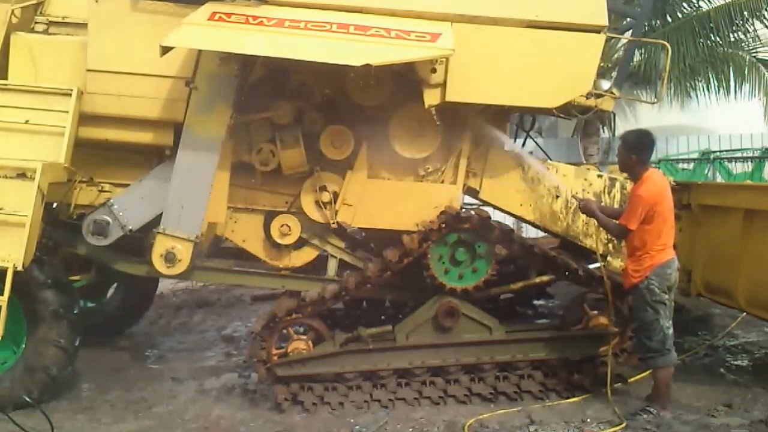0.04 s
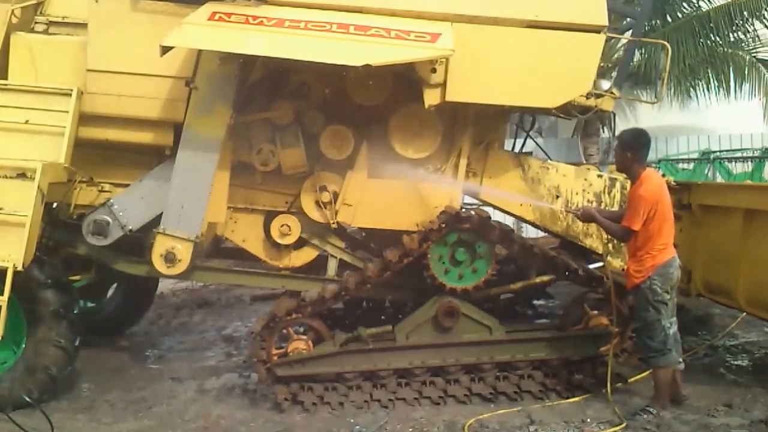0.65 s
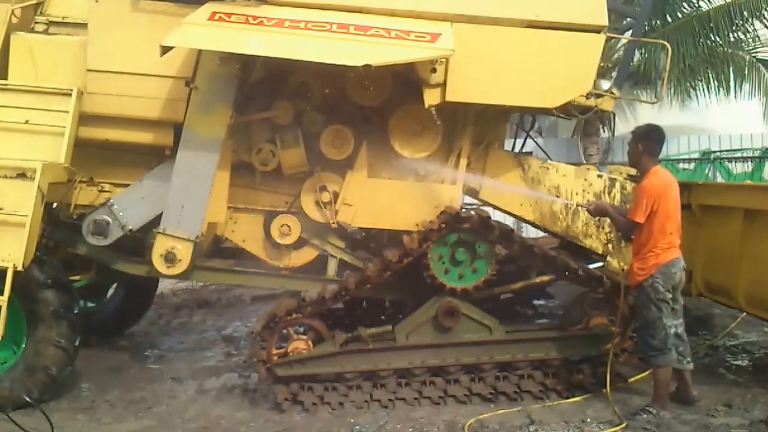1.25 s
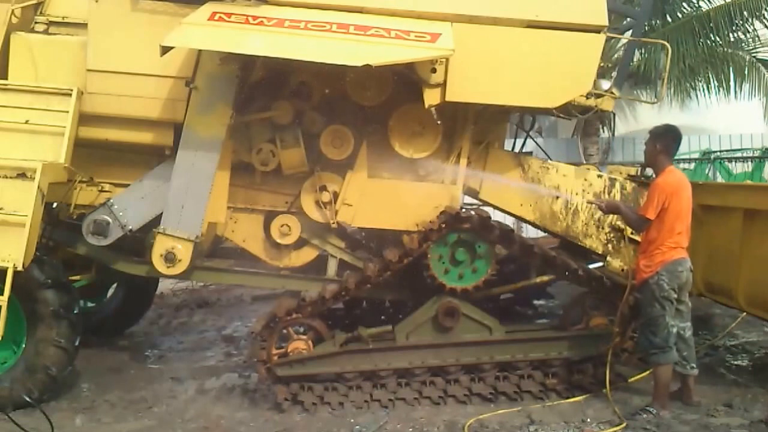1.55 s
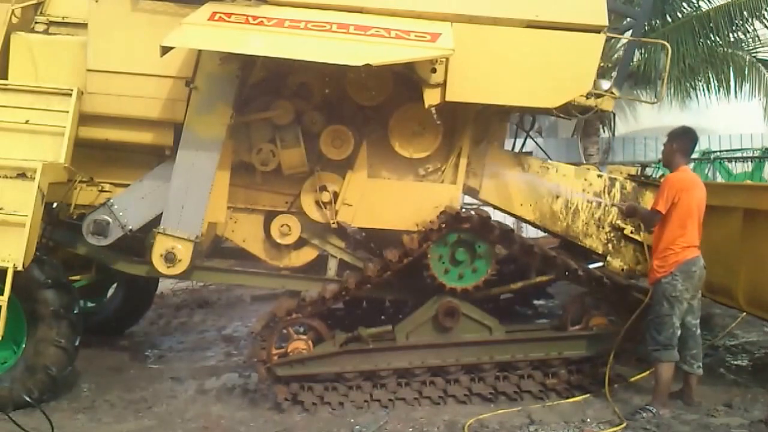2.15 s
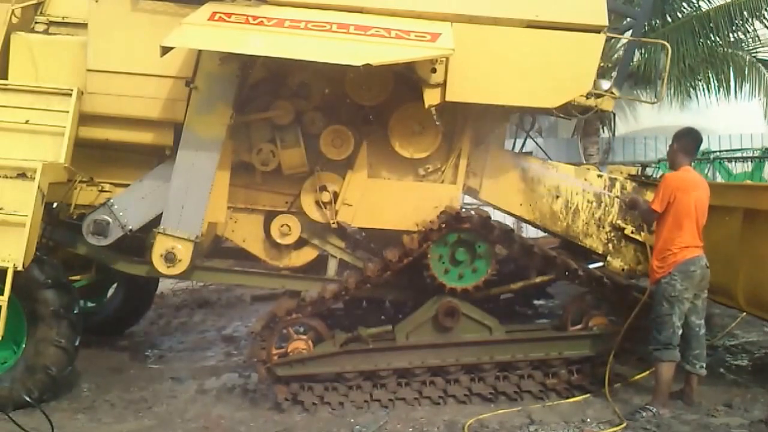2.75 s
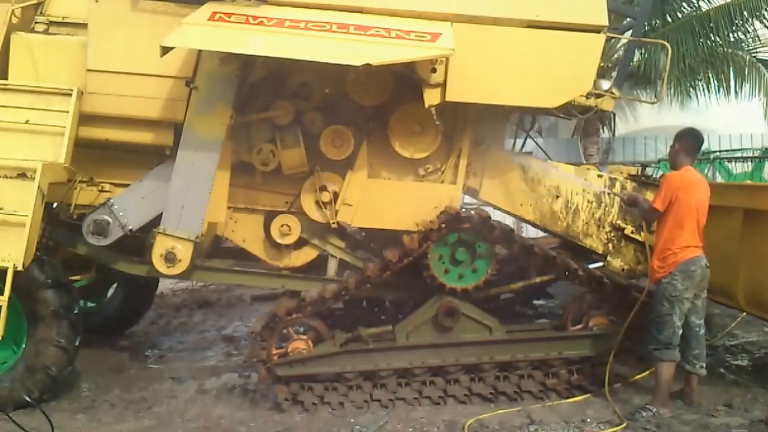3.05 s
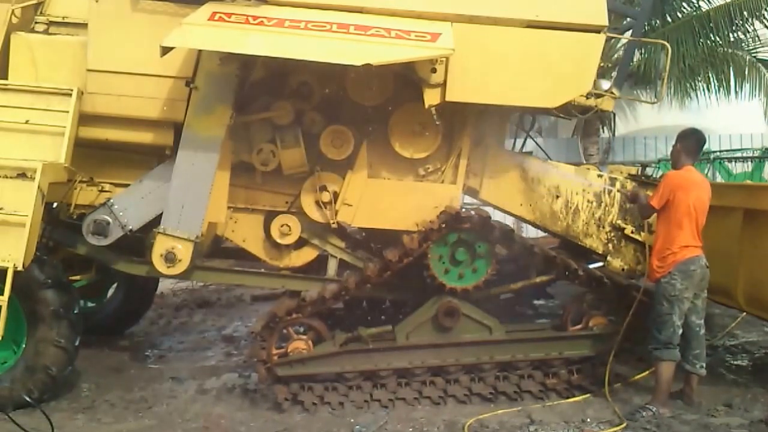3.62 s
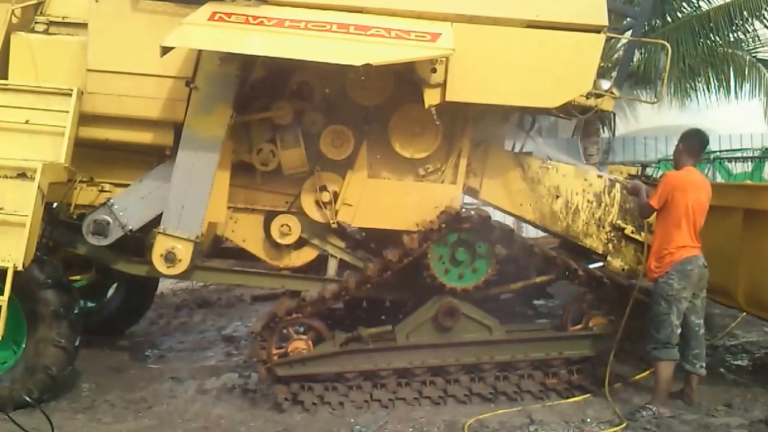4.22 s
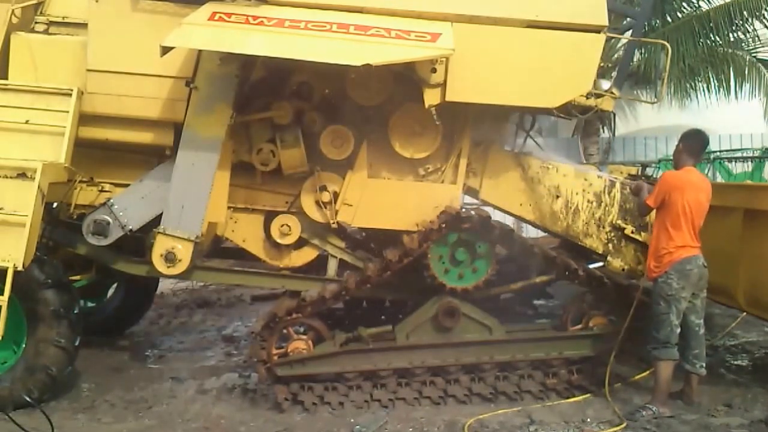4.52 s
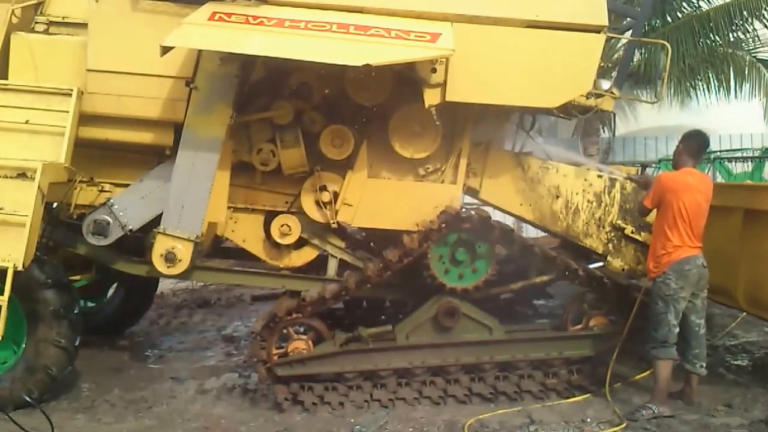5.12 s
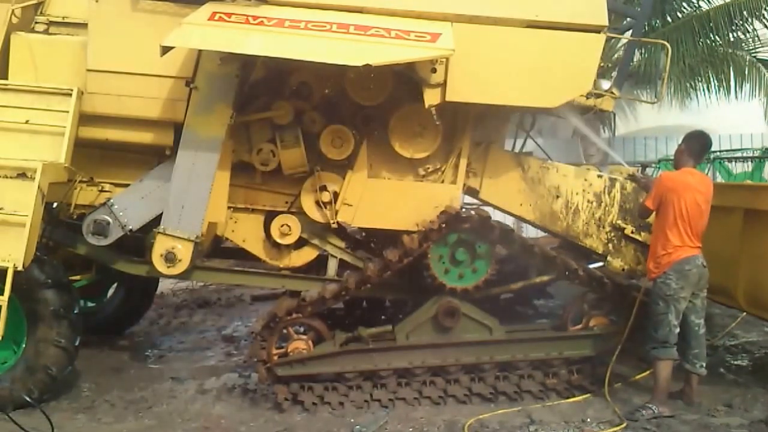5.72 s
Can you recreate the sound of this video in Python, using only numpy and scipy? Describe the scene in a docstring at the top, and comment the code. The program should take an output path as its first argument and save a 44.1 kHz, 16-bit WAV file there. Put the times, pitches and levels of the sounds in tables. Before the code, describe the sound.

A pressure washer sprays a big steel farm machine outdoors, a few metres from the microphone. Its bright hiss and rough splash run without a break, flaring briefly as the jet crosses edges. The spray swells twice around the middle, then drops suddenly to a softer hiss. Underneath, the panels drum and occasionally give a faint boom over a low outdoor rumble.

```python
"""A pressure washer jet plays over the muddy side of a big steel farm machine, outdoors, a few metres away.
It hisses as it breaks into mist and splash, flares across edges and rasps in recesses.
Its push drums on the panels and now and then sets a large sheet booming.
Drops patter on the steel over a low outdoor rumble."""
import sys
import numpy as np
from scipy import signal
from scipy.fft import rfft, irfft
from scipy.io import wavfile
from scipy.ndimage import uniform_filter1d

SR = 44100
rng = np.random.default_rng(int(sys.argv[2]) if len(sys.argv) > 2 else 0)


def pcm_store(signal):
    """Save signal as 16-bit PCM."""
    levels = np.round(np.clip(np.atleast_2d(signal), -1, 1) * 32767)
    wavfile.write(sys.argv[1], SR, levels.astype(np.int16).T)


N = 254456
TIME = np.arange(N) / SR
BINS_HZ = np.fft.rfftfreq(N, 1 / SR)


def gain_of(db):
    """Decibels to a linear gain."""
    return 10 ** (np.asarray(db) / 20)


def unit_rms(x):
    """Scales to rms 1."""
    return x / np.sqrt(np.mean(x ** 2) + 1e-20)


def curve(points, hz=BINS_HZ):
    """Joins a table's points with straight lines on a log-frequency axis."""
    points_hz, values = np.transpose(points)
    return np.interp(np.log(hz + 1), np.log(points_hz), values)


def bell(centre_s, half_length_s):
    """A bell-shaped envelope peaking at 1."""
    return np.exp(-((TIME - centre_s) / half_length_s) ** 2)


def shaped(x, gain):
    """Filters by a gain for each frequency, then scales to rms 1."""
    return unit_rms(irfft(rfft(x) * gain, N))


def wander(top_hz):
    """Random modulation of rms 1, rolling off above top_hz."""
    return shaped(rng.standard_normal(N), (BINS_HZ > .5) / (1 + (BINS_HZ / top_hz) ** 4))


# Likeness of left and right: frequency_hz, correlation
STEREO_LIKENESS = [(30, 0.28), (90, 0.6), (300, 0.62), (640, 0.44), (1400, 0.25), (3000, 0.063),
                   (7000, 0.026)]

def turbulence(patchy_db, frame=1024, hop=256):
    """Stereo noise whose colour shifts in short patches, narrower in the bass and wide in the treble."""
    hz = np.fft.rfftfreq(frame, 1 / SR)
    a, b, c, d, patches = rng.standard_normal((N // hop + 5, len(hz), 5)).T
    patches = uniform_filter1d(patches, size=12, axis=0)  # across frequency
    patches = unit_rms(uniform_filter1d(patches, size=10, axis=1))  # across time
    likeness = curve(STEREO_LIKENESS, hz)[:, None]
    left = a + 1j * b
    right = likeness * left + np.sqrt(1 - likeness ** 2) * (c + 1j * d)
    spectra = np.array([left, right]) * gain_of(patchy_db * patches)
    return signal.istft(spectra, nperseg=frame, noverlap=frame - hop)[1][:, :N]


def noise_bed(spectrum, patchy_db):
    """Turbulent noise of rms 1, coloured by a spectrum table."""
    return shaped(turbulence(patchy_db), gain_of(curve(spectrum)))


# Tone of the outdoor background: frequency_hz, relative_db
RUMBLE_TONE = [(10, -19), (25, 1.5), (55, 3), (100, -1.5), (150, -6), (220, -13.5), (500, -20), (2000, -35)]

def rumble(level_db):
    """A low, steady outdoor bed."""
    return noise_bed(RUMBLE_TONE, patchy_db=.5) * gain_of(level_db)


# The jet sets a large sheet booming: start_s, length_s, level_db
SHEET_BOOMS = [(0, 0.22, -48.5), (1.18, 0.14, -44.5), (1.55, 0.082, -50), (4.08, 0.22, -45.5),
               (4.8, .12, -53), (5.147, 0.11, -48.5), (5.514, 0.13, -46)]

def boom(waver, throb_db, pitch_hz=78.4, rise_hz_per_s=1.2, attack_s=0.047, release_s=0.054):
    """A large sheet's lowest mode; the pitch creeps up over the scene and wavers with the load of water."""
    hz = (pitch_hz + rise_hz_per_s * TIME) * (1 + waver * wander(top_hz=5.3))
    envelope = gain_of(-60)  # faint hum between booms
    for start_s, length_s, level_db in SHEET_BOOMS:
        age_s = TIME - start_s
        swell = np.clip(age_s / attack_s, 0, 1)
        decay = np.exp(-np.maximum(age_s - length_s, 0) / release_s)
        envelope = envelope + gain_of(level_db) * swell * decay
    tone = unit_rms(np.sin(2 * np.pi * np.cumsum(hz) / SR))
    return tone * envelope * gain_of(throb_db * wander(top_hz=18))


# Resonances of the steel panels: pitch_hz, width_hz, peak_db
STEEL_MODES = [(229.3, 29, 10.5), (315, 19, 8), (334, 29, 4), (439.5, 16.4, 8.5), (515, 7, 10),
               (636, 21, 11), (774, 14, 6), (937, 38, 6), (1205, 65, 3), (1258, 120, 2)]

def steel_resonance():
    """Gain at each frequency of the mud-damped sheet metal: mode peaks on a flat floor."""
    peaks = sum(gain_of(peak_db) ** 2 / (1 + (2 * (BINS_HZ - pitch_hz) / width_hz) ** 2)
                for pitch_hz, width_hz, peak_db in STEEL_MODES)
    return np.sqrt(1 + peaks)


# The jet crosses loose metal: centre_s, half_length_s, pitch_hz, level_db
LOOSE_SPOT_HITS = [(0.093, 0.027, 402, -42.5), (0.202, 0.048, 210, -44), (1.045, 0.039, 630, -40.5),
                   (1.33, .05, 380, -47.5), (1.658, 0.015, 630, -42.5), (2.48, 0.036, 520, -48),
                   (4.171, 0.04, 270, -47), (5.626, 0.056, 280, -46.5)]

def loose_spots(width_octaves):
    """Each loose spot rings out briefly, favouring the panel modes near its pitch."""
    push = turbulence(patchy_db=3.0)
    resonance = steel_resonance()
    out = np.zeros((2, N))
    for centre_s, half_length_s, pitch_hz, level_db in LOOSE_SPOT_HITS:
        favoured = np.exp(-(np.log2((BINS_HZ + 1) / pitch_hz) / width_octaves) ** 2)
        out += shaped(push, resonance * favoured) * gain_of(level_db) * bell(centre_s, half_length_s)
    return out


# Broad tone of the panels: frequency_hz, relative_db
PANEL_TONE = [(100, -19), (200, -8.5), (400, 0.5), (700, -5), (1200, -4), (2000, -4), (4000, -26)]
# How squarely the jet meets the panels: time_s, level_db (before trim)
PANEL_DRIVE = [(0, -46), (.85, -46), (1.35, -44.5), (2.1, -44), (2.7, -46.5), (3.9, -46.5), (4.05, -49.5),
               (5.77, -49.5)]

def panels(trim_db, buffet_db):
    """The uneven push of the jet keeps the steel drumming."""
    level_db = np.interp(TIME, *np.transpose(PANEL_DRIVE)) + trim_db
    push = turbulence(patchy_db=2.0) * gain_of(buffet_db * wander(top_hz=30))
    return shaped(push, steel_resonance() * gain_of(curve(PANEL_TONE))) * gain_of(level_db)


def reflections(water, echo_db, span_s, drift_s, count=4):
    """Adds early echoes off the machine and wet ground; they drift as the jet moves, so the hiss phases."""
    echoes = np.zeros((2, N))
    for side in range(2):
        for path_s in np.geomspace(.0018, span_s, count):
            delay_s = path_s * rng.uniform(.85, 1.15) + drift_s * wander(top_hz=1.43)
            echoes[side] += np.interp(TIME - delay_s, TIME, water[side], left=0)
    send = gain_of(echo_db)
    return (water + send * echoes / np.sqrt(count)) / np.hypot(1, send)


def hollows(water, pitch_hz, width_hz, gain_db, drift):
    """The spray excites a narrow ring in the machine's hollows, wavering as the jet moves."""
    hz = pitch_hz * (1 + drift * wander(top_hz=4))
    carrier = np.exp(2j * np.pi * np.cumsum(hz) / SR)
    pole = np.exp(-np.pi * width_hz / SR)
    band = signal.lfilter([1 - pole], [1, -pole], water / carrier)  # shifted to 0 Hz and low-passed
    return 2 * gain_of(gain_db) * (carrier * band).real


def drops(level_db, spread_db, rate_per_s):
    """Large drops tick on the steel with the tone of the splash; a few are much heavier than the rest."""
    weight = gain_of(spread_db * np.minimum(rng.exponential(1, (2, N)), 4))
    polarity = rng.choice([-1, 1], (2, N))
    lands = rng.random((2, N)) < rate_per_s / SR
    return shaped(weight * polarity * lands, gain_of(curve(SPLASH_TONE))) * gain_of(level_db)


# The jet bites into a recess: centre_s, half_length_s, level_db
RECESS_BITES = [(0.049, 0.011, -35), (0.196, 0.017, -32.5), (0.263, 0.015, -33.5), (1.04, 0.033, -37),
                (1.785, 0.03, -39), (3.22, 0.022, -26), (3.295, 0.026, -34.5)]
# Tone of the lower, rasping splash there: frequency_hz, relative_db
RECESS_TONE = [(700, -22), (1500, -16), (2200, -1.5), (4200, 7), (6500, 4), (12000, -25)]

def bites():
    """Short, rough bursts as water is thrown back out of a recess."""
    envelope = sum(gain_of(db) * bell(centre_s, half_s) for centre_s, half_s, db in RECESS_BITES)
    return noise_bed(RECESS_TONE, patchy_db=1.5) * envelope


# Tone of water hitting steel: frequency_hz, relative_db
SPLASH_TONE = [(300, -24.5), (900, -12), (1400, -8), (2300, -2), (3200, -1.5), (4200, 0.5), (6000, 1),
               (8000, -6.5), (11000, -9), (16000, -15.5)]

def splash(level_db, sputter_db):
    """Countless impacts merge into a rough hiss that sputters as the water film tears."""
    return noise_bed(SPLASH_TONE, patchy_db=1.0) * gain_of(level_db + sputter_db * wander(top_hz=150))


# Tone of the fine spray: frequency_hz, relative_db
MIST_TONE = [(1000, -49), (3000, -11.5), (4500, -1), (7000, 0), (10000, 1.5), (14000, 2), (16000, -0.5)]

def mist(level_db, flutter_db):
    """The jet atomises into a fine, bright hiss."""
    return noise_bed(MIST_TONE, patchy_db=1.34) * gain_of(level_db + flutter_db * wander(top_hz=120))


# How hard the jet lands as the lance sweeps: time_s, impact_db
LANCE_SWEEP = [(0, -35), (.28, -34.5), (.5, -36), (1.15, -34), (1.55, -35), (2.0, -34), (2.17, -29.5),
               (2.5, -29), (2.57, -25), (3.02, -25.5), (3.14, -33), (3.45, -30), (3.58, -26), (3.95, -25.5),
               (4.0, -40), (4.43, -36), (4.75, -38.5), (5.77, -39.5)]
# The jet catches an edge and flares: centre_s, half_length_s, splash_boost_db, mist_boost_db
EDGE_FLARES = [(0.045, 0.018, 2, 4), (0.194, 0.025, 3.5, 4), (0.26, 0.015, 3, 3), (0.364, 0.019, 3, 0.5),
               (0.644, 0.029, 4, 2.5), (0.83, 0.01, -0.5, 4), (0.93, 0.064, 4.5, 7.5),
               (1.038, 0.043, 5.5, 6), (1.303, 0.033, 1, 2), (1.435, 0.027, 2.5, 1),
               (1.797, 0.072, 4.5, 3.5), (2.036, 0.012, 4.5, 0), (2.138, 0.011, 6, 1),
               (3.222, 0.045, 4.5, 4), (3.304, 0.072, 3.5, 1.5), (4.33, 0.017, 1.5, 5.5),
               (5.227, .025, 0.5, 3), (5.38, .06, 0.5, 2), (5.68, 0.1, 2, 6.5)]
# The jet slips through a gap and dips: centre_s, half_length_s, gain_db
GAP_DIPS = [(3.08, 0.054, -2), (4.225, .07, -1), (5.52, .04, -1.5)]

def jet(usual_db=-34):
    """Splash, mist and drops ride the sweep of the lance and share one unsteady flow."""
    harder_db = np.interp(TIME, *np.transpose(LANCE_SWEEP)) - usual_db
    dip_db = sum(db * bell(centre_s, half_s) for centre_s, half_s, db in GAP_DIPS)
    flow_db = usual_db + dip_db + 0.46 * wander(top_hz=21.9)
    mist_db = flow_db + harder_db
    splash_db = flow_db + 0.4 * harder_db - 0.02 * harder_db ** 2  # grows more slowly and levels off
    for centre_s, half_length_s, splash_boost_db, mist_boost_db in EDGE_FLARES:
        crossing = bell(centre_s, half_length_s)
        splash_db += splash_boost_db * crossing
        mist_db += mist_boost_db * crossing
    water = splash(splash_db - 1.28, sputter_db=0.23) + mist(mist_db + 0.83, flutter_db=0.63)
    water += drops(splash_db - 19, spread_db=2.5, rate_per_s=500) + bites()
    water += hollows(water, pitch_hz=5170, width_hz=350, gain_db=-9, drift=.04)
    water = reflections(water, echo_db=-10, span_s=.009, drift_s=0.000249)
    water[1] *= gain_of(-0.13 * harder_db)  # hard impacts sit further left
    return water


def scene():
    """The jet up front, the ringing steel under it and the outdoor rumble behind."""
    water = jet()
    steel = panels(trim_db=0.5, buffet_db=1.3) + loose_spots(width_octaves=0.45)
    return water + steel + boom(waver=0.03, throb_db=1.5) + rumble(level_db=-46)


# Colour of the left and right microphone ports: frequency_hz, gain_db
LEFT_EQ = [(60, 1.1), (250, 3.5), (600, 4), (2300, 6), (3700, 6), (5100, 8), (6200, 5.5), (7000, 2),
           (7700, -.5), (8300, -4), (9300, -1.5), (10600, 5), (12800, 7.5), (15000, 10.5)]
RIGHT_EQ = [(60, -1), (400, -1), (800, -5.5), (1100, -5.5), (1350, -3.5), (2000, -9.5), (3700, -6.5),
            (5200, -8.3), (7200, -4.5), (8400, -1.5), (9400, -5), (10800, -3.5), (12800, -4.5),
            (15000, -5.5)]

def record(dry, cutoff_hz=15760):
    """The left port faces the spray and rings in the treble, the right is shaded; both are low-passed."""
    ports_db = np.array([curve(LEFT_EQ), curve(RIGHT_EQ)])
    coloured = irfft(rfft(dry) * gain_of(ports_db), N)
    lowpass = signal.firwin(2001, cutoff_hz, window=("kaiser", 8), fs=SR)
    return signal.oaconvolve(coloured, lowpass[None], "same")


dry = scene()
out = record(dry)
pcm_store(out)
```